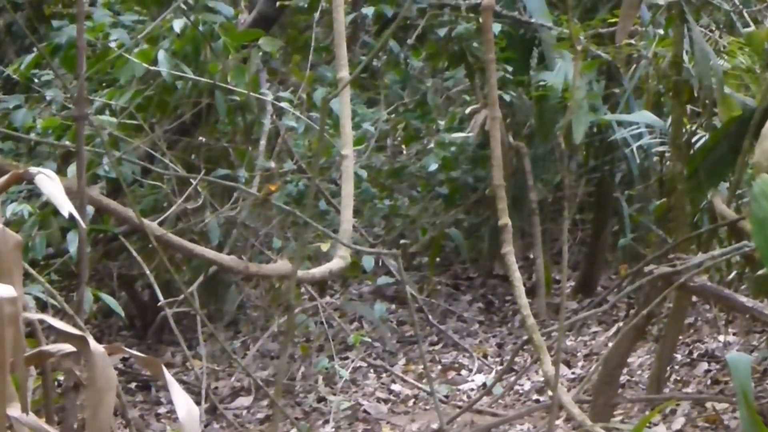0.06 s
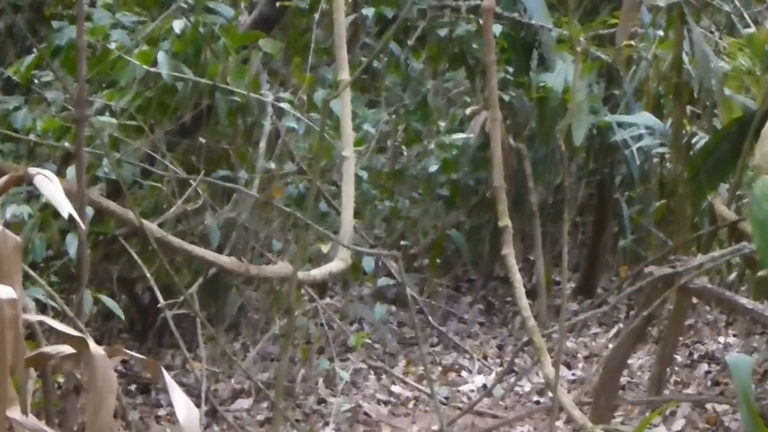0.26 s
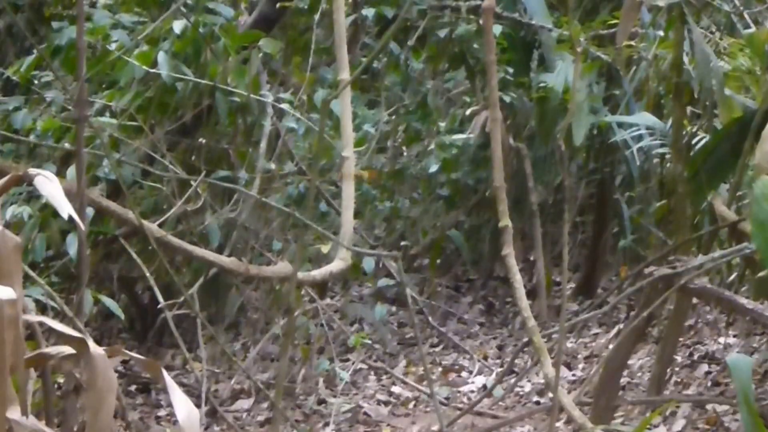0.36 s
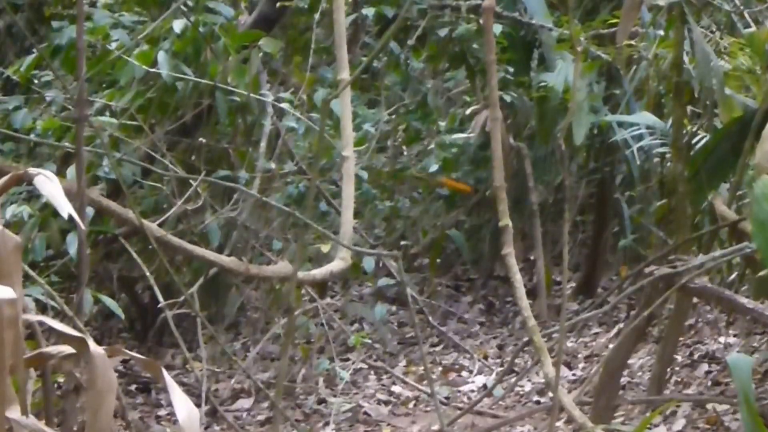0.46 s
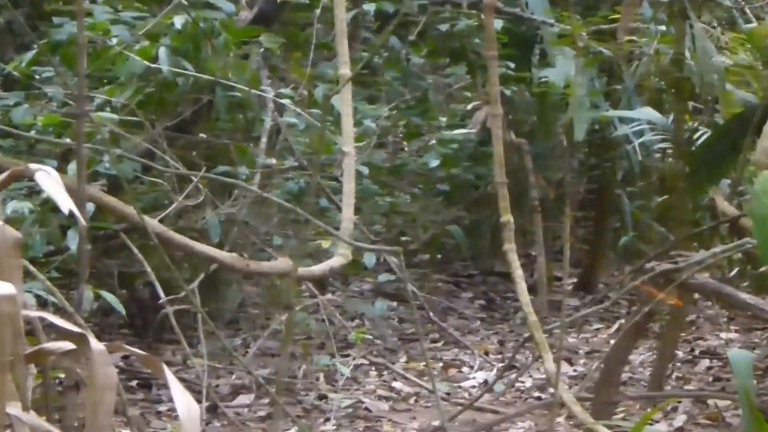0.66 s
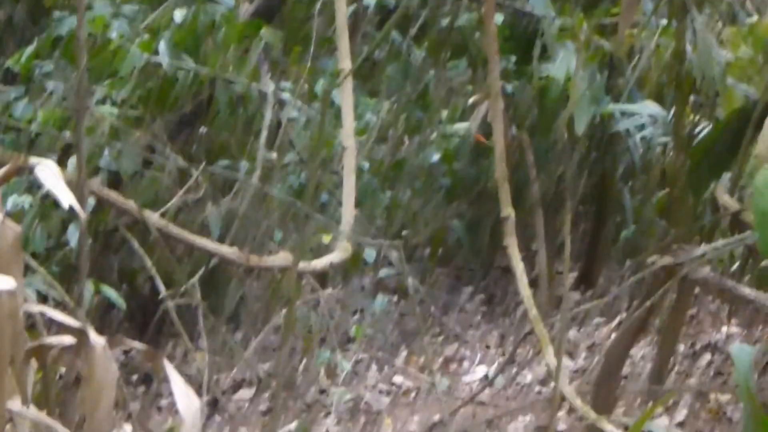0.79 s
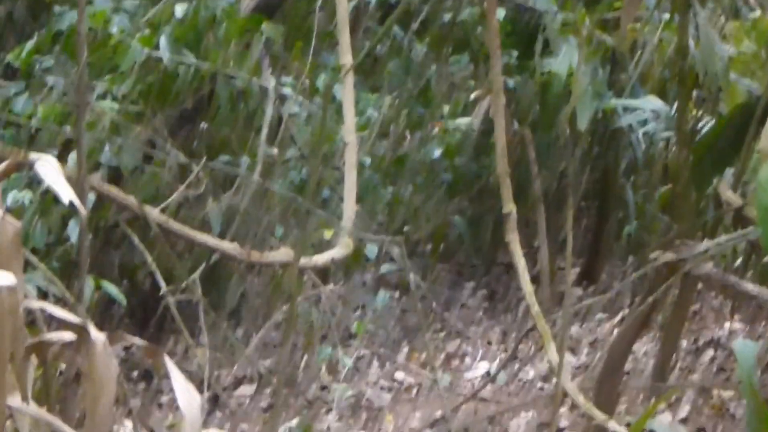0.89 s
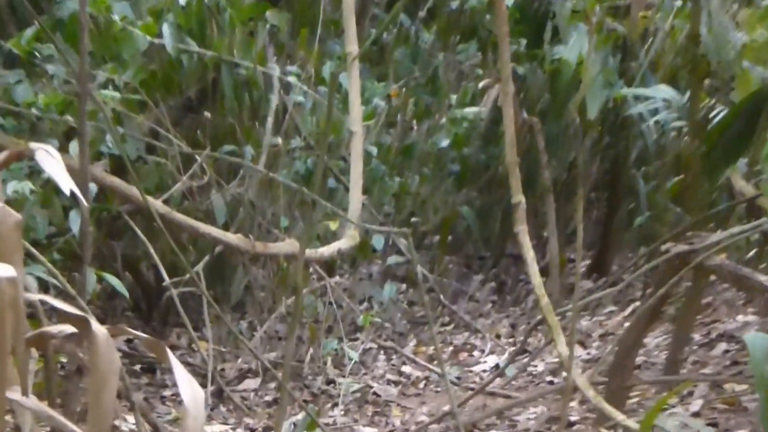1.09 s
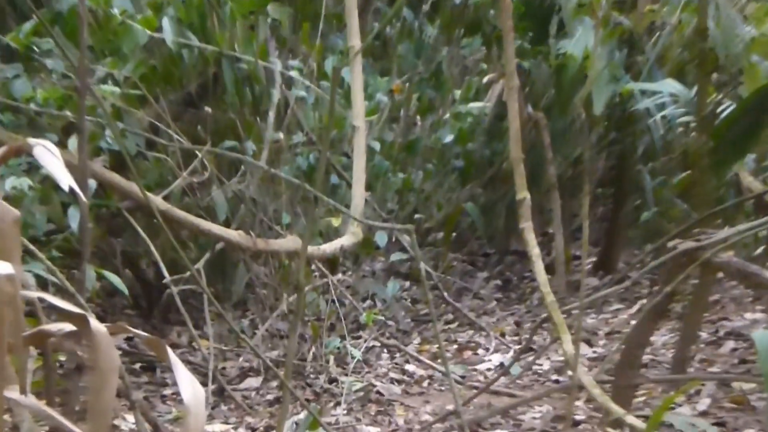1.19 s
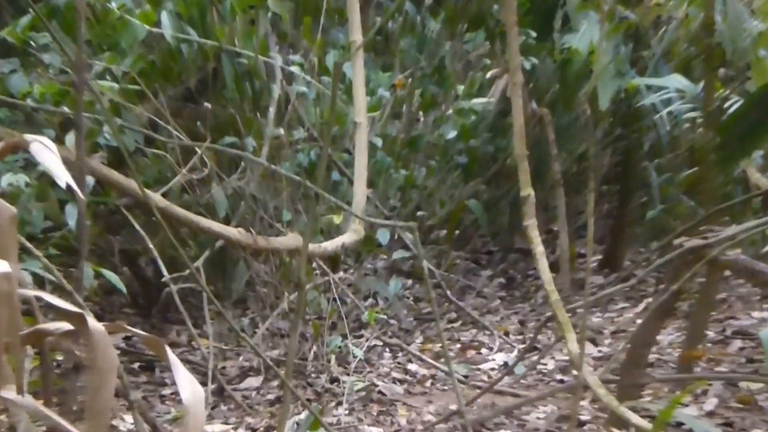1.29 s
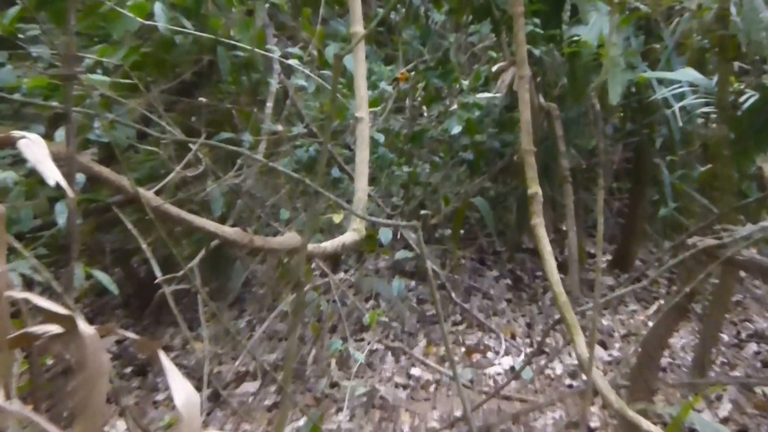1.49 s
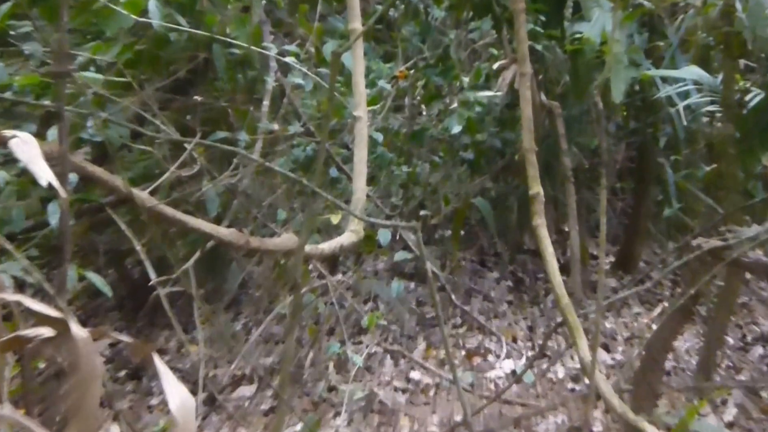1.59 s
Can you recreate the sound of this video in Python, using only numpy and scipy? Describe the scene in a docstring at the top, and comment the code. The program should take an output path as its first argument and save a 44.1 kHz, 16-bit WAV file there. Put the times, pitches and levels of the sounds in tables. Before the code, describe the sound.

A small bird snaps its wings five times and calls thinly in quiet woods.

```python
"""A manakin cracks its wings five times as it darts between saplings on a forest floor.
Each snap is a sharp pulse with a brief ring, bounced off the ground and scattered by trunks and leaves.
Air puffs through its feathers, and a thin arched call rises and falls after the fourth snap.
Behind it dry leaves stir and far birds whistle and chatter, over a low forest hush with two soft
bass swells, a faint band of insects and tiny high pips."""
import sys
import numpy as np
from scipy import signal
from scipy.io import wavfile

SR = 44100
rng = np.random.default_rng(int(sys.argv[2]) if len(sys.argv) > 2 else 0)


def master_out(mix):
    """Clip the mix to full scale and print it as 16-bit PCM to the path in sys.argv[1]."""
    frames = np.transpose(np.atleast_2d(mix))
    ceiling = np.clip(frames, -1, 1)
    pcm = np.round(ceiling * 32767).astype(np.int16)
    wavfile.write(sys.argv[1], SR, pcm)


N = 72765
TIME = np.arange(N) / SR

# wing snaps: (time [s], crack level [dB], five wing mode levels [dB], low cut [Hz],
# ground echo delay [s], ground echo gain [dB], send to twigs and forest [dB])
WING_SNAPS = [(0.2384, -11.5, -21, -23, -34, -25, -43, 1090, 0.0021, -22, -13),
              (0.4144, -14, -31, -25.5, -20, -63, -21.5, 600, 0.0031, -13, -11.5),
              (0.6327, -15.5, -21.5, -28, -52, -15.5, -20.5, 910, 0.0045, -19, -16.5),
              (0.9157, -47, -61, -34, -29.5, -52, -37, 600, 0.0022, -1.5, -14),
              (1.2910, -14.5, -31, -37, -56, -11, -8.5, 878, 0.0028, -15, -13.5)]
# the ring of the wings: (frequency [Hz], t60 [s])
WING_RING = [(1130, 0.0068), (1720, 0.018), (2380, 0.0078), (3380, 0.0062), (4750, 0.0056)]
# soft wing beats: (time [s], level [dB])
WING_BEATS = [(0.7405, -41.5), (0.756, -37), (0.770, -42), (0.8025, -36.5), (0.8175, -34.5), (0.885, -43)]
# air through the wings at take-off: (time [s], level [dB])
TAKEOFF_PUFFS = [(0.175, -56)]
# the arched call: (time [s], pitch [Hz], relative level [dB], brightness [dB],
# forest send as the bird turns [dB])
CALL_ARCH = [(0.936, 4750, -69, -18, -13), (0.973, 4930, -44, -14, -6), (0.989, 4850, -49, -16, -6),
             (0.993, 3222, -57, 9, -2), (1.010, 4080, -44.5, 3, -8), (1.022, 4380, -50, 7, 8),
             (1.04, 4390, -62, 9, 5), (1.048, 4120, -44, -13, -1), (1.06, 3726, -38, -9, -10),
             (1.095, 3073, -39.5, -8, -9.5), (1.133, 2778, -38.5, -17, -11), (1.171, 2526, -49, -23, -9),
             (1.207, 1850, -46, -20, -28)]
# the call's overtones: (multiple of the pitch, relative level [dB])
CALL_HARMONICS = [(2, -12), (3, -17.5), (4, -26)]
# the forest's diffuse reverb: (frequency [Hz], relative spectral density [dB], t60 [s])
FOREST_REVERB = [(600, -41, 0.091), (1370, -10.5, 0.38), (2160, 5, 0.36), (3130, -1, 0.61),
                 (4760, 4.5, 0.56), (6180, -2.5, 0.43), (7400, -17.5, 0.36), (15000, -20.5, .22)]
# faint rustles in the leaf litter: (time [s], level [dB])
LEAF_RUSTLES = [(1.566, -53), (1.580, -41.5)]
# a far bird's two whistles: (time [s], length [s], pitch [Hz], level [dB])
FAR_WHISTLES = [(1.405, 0.067, 1320, -53), (1.503, 0.0857, 1456, -49)]
# far chatter: (time [s], length [s], pitch [Hz], level [dB])
FAR_CHIRPS = [(-0.02, 0.06, 3036, -51), (0.09, 0.05, 2700, -47.5), (0.5, 0.057, 3080, -50)]
# tone colour of the hush: (frequency [Hz], relative spectral density [dB])
HUSH_SPECTRUM = [(25, -47), (50, -21.5), (90, -8), (140, -2), (200, -1.5), (400, -3.5), (800, -8.5),
                 (1400, -12.5), (2600, -10.5), (4500, -19), (7000, -26), (10000, -33), (15500, -36)]
# fader moves on the hush: (time [s], low band gain [dB], high band gain [dB])
HUSH_FADERS = [(0, 1, -1.5), (0.25, -1, -1.5), (0.6, 0.5, -1.5), (0.9, 0, -1.5), (1.15, -1, -0.5),
               (1.4, -3.5, -3.5), (1.65, 0, -0.5)]
# soft swells in the bass: (time [s], level [dB])
BASS_SWELLS = [(0.19, -47), (0.80, -50)]
# the recorder's narrow dips: (frequency [Hz], width [Hz])
EQ_NOTCHES = [(2905, 137), (11800, 560)]


def wing_snaps(forest, twig_echoes_per_s=4000, twig_db=-3, forest_db=8):
    """Each snap cracks and rings, then echoes off the ground, nearby twigs and the forest."""
    out = np.zeros(N)
    for s, crack_db, *mode_dbs, low_cut_hz, delay_s, ground_db, send_db in WING_SNAPS:
        hit = click(s)
        pulse = wing_crack(hit)
        ringing = sum(from_db(db) * ring(hit, hz, t60) for db, (hz, t60) in zip(mode_dbs, WING_RING))
        direct = from_db(crack_db) * pulse + ringing
        ground = from_db(ground_db) * np.interp(TIME - delay_s, TIME, direct)
        twigs = (rng.random(N) < twig_echoes_per_s / SR) * rng.standard_normal(N)
        twigs *= decay(t60=0.053) * (TIME > 0.001)  # 1 ms pre-delay
        near = direct + ground + from_db(send_db + twig_db) * reverb(pulse, twigs)
        near = butter(near, low_cut_hz, "high", order=4)
        out += butter(near, 10100, "low") + from_db(send_db + forest_db) * reverb(hit, forest)
    return out


def wing_crack(hit, hz=3610, width_hz=2180):
    """The sharp, two-sided pressure pulse of the wings meeting."""
    pulse = resonate(resonate(hit, hz, width_hz), hz, 2 * width_hz)
    return pulse / np.abs(pulse).max()


def feather_air(rows, rise_s, hz, width_hz):
    """Air pushed through the feathers: puffs of band-passed noise."""
    air = resonate(resonate(rng.standard_normal(N), hz, width_hz), hz, 2 * width_hz)
    return unit_rms(air) * puffs(rows, rise_s)


def arched_call(forest, waver=0.007, roughness_db=2.5):
    """A thin, slightly rough glide, brightest at the top of its arch, ringing on among the trees."""
    s, hz, db, bright_db, send_db = np.transpose(CALL_ARCH)
    pitch = np.interp(TIME, s, hz) * (1 + waver * drift(340))
    phase = 2 * np.pi * np.cumsum(pitch) / SR
    gate = (TIME > s[0]) * (TIME < s[-1])
    envelope = np.sqrt(2) * from_db(np.interp(TIME, s, db) + roughness_db * drift(120)) * gate
    tone = envelope * np.sin(phase)
    overtones = sum(from_db(k_db) * np.sin(k * phase) for k, k_db in CALL_HARMONICS)
    overtones *= envelope * from_db(np.interp(TIME, s, bright_db))
    leaves = rng.standard_normal(N) * decay(t60=0.28)
    direct = from_db(-7.5) * tone + from_db(-10) * overtones
    send = tone * from_db(np.interp(TIME, s, send_db))
    return direct + from_db(-4) * reverb(send, forest) + from_db(1) * reverb(overtones, leaves)


def forest_response(onset_s=0.0013):
    """Countless echoes from leaves and trunks, dying away band by band."""
    tail = sum(band * from_db(at_hz(FOREST_REVERB, hz)) * decay(at_hz(FOREST_REVERB, hz, column=2))
               for hz, band in noise_bands())
    return tail * (1 - np.exp(-TIME / onset_s))


def leaf_litter():
    """Dry leaves shift in tiny bursts of noise."""
    rustle = butter(rng.standard_normal(N), [300, 3900], "band")
    return unit_rms(rustle) * puffs(LEAF_RUSTLES, rise_s=0.0016)


def far_bird(rows, glide_hz_per_s, waver):
    """Distant notes that swell, glide a little and fade."""
    out = np.zeros(N)
    for s, length, hz, db in rows:
        progress = np.clip((TIME - s) / length, 0, 1)
        pitch = (hz + glide_hz_per_s * length * (progress - 0.5)) * (1 + waver * drift(196))
        envelope = from_db(db) * np.sqrt(2 * np.abs(np.sin(np.pi * progress)))
        out += envelope * np.sin(2 * np.pi * np.cumsum(pitch) / SR)
    return out


def forest_hush(split_hz=1200, flicker_db=2):
    """A bed of forest air that flickers band by band and dips a little near the end."""
    s, low_db, high_db = np.transpose(HUSH_FADERS)
    air = np.zeros(N)
    for hz, band in noise_bands():
        fader_db = np.interp(TIME, s, low_db if hz < split_hz else high_db)
        air += band * from_db(at_hz(HUSH_SPECTRUM, hz) + fader_db + flicker_db * drift(22))
    return from_db(-45.5) * unit_rms(air)


def bass_swells():
    """Soft low swells in the hush."""
    rumble = resonate(rng.standard_normal(N), hz=171, width_hz=60)
    return unit_rms(rumble) * puffs(BASS_SWELLS, rise_s=0.034)


def insects():
    """Insects blur into one faint, narrow band of noise."""
    return from_db(-58.5) * unit_rms(resonate(rng.standard_normal(N), hz=3076, width_hz=93))


def high_pips(hz=12450, first_s=0.004, pips_per_s=29.97, half_width_s=0.0016):
    """Tiny pips at a steady rate, probably electrical."""
    from_centre_s = (((TIME - first_s) * pips_per_s + 0.5) % 1 - 0.5) / pips_per_s
    envelope = np.exp(-(from_centre_s / half_width_s) ** 2)
    return from_db(-59.5) * envelope * np.sin(2 * np.pi * hz * TIME)


def from_db(db):
    """Decibels to gain."""
    return 10 ** (np.asarray(db) / 20)


def unit_rms(x):
    """Normalise to rms 1."""
    return x / np.sqrt(np.mean(x ** 2) + 1e-20)


def at_hz(rows, hz, column=1):
    """Read a table column along a log-frequency axis."""
    rows = np.array(rows)
    return np.interp(np.log(hz), np.log(rows[:, 0]), rows[:, column])


def butter(x, hz, kind, order=2):
    """Causal Butterworth filter."""
    sos = signal.butter(order, np.clip(hz, 10, SR / 2 - 500), kind, fs=SR, output="sos")
    return signal.sosfilt(sos, x + 1e-18)


def drift(rate_hz):
    """Smooth random modulation of rms 1."""
    return unit_rms(butter(rng.standard_normal(N + SR), rate_hz, "low")[SR:])


def click(s):
    """A unit impulse at time s."""
    return 1.0 * (np.arange(N) == int(s * SR))


def ring(x, hz, t60):
    """A damped mode: a click sets a sine ringing."""
    r, w = from_db(-60 / (t60 * SR)), 2 * np.pi * hz / SR
    return signal.lfilter([0, np.sin(w)], [1, -2 * r * np.cos(w), r * r], x + 1e-18)


def resonate(x, hz, width_hz):
    """A resonant band-pass with unity gain at its peak."""
    r, w = np.exp(-np.pi * width_hz / SR), 2 * np.pi * hz / SR
    numerator = np.array([1, 0, -1]) * (1 - r * r) / 2
    return signal.lfilter(numerator, [1, -2 * r * np.cos(w), r * r], x + 1e-18)


def noise_bands():
    """Third-octave bands of noise: (centre [Hz], samples)."""
    edges = 20 * 2 ** (np.arange(31) / 3)
    white = rng.standard_normal((2, N + SR))
    return [(np.sqrt(lo * hi), butter(white[k % 2], [lo, hi], "band")[SR:])
            for k, (lo, hi) in enumerate(zip(edges, edges[1:]))]


def decay(t60):
    """An envelope that falls 60 dB in t60 seconds."""
    return np.exp(-np.log(1000) * TIME / t60)


def puffs(rows, rise_s):
    """An envelope of short puffs that swell and fade."""
    ages = [(np.maximum(TIME - s, 0) / rise_s, db) for s, db in rows]
    return sum(from_db(db) * age * np.exp(1 - age) for age, db in ages)


def reverb(x, response):
    """Convolve with a response scaled to unit energy."""
    return signal.fftconvolve(x, response / np.sqrt(np.sum(response ** 2) + 1e-20))[:N]


def scene():
    """The mono mix: the manakin up front, far birds and the forest bed behind."""
    forest = forest_response()
    whistles = far_bird(FAR_WHISTLES, glide_hz_per_s=700, waver=0.0071)
    chatter = far_bird(FAR_CHIRPS, glide_hz_per_s=-500, waver=0.0467)
    flutter = feather_air(WING_BEATS, rise_s=0.0013, hz=2730, width_hz=480)
    takeoff = feather_air(TAKEOFF_PUFFS, rise_s=0.036, hz=4700, width_hz=1000)
    manakin = wing_snaps(forest) + flutter + takeoff + arched_call(forest)
    bed = forest_hush() + insects() + bass_swells() + high_pips()
    return (manakin + leaf_litter() + whistles + chatter + bed)[None]


def record(dry, high_cut_hz=15800):
    """Master EQ: two narrow notches and a steep high cut."""
    for hz, width_hz in EQ_NOTCHES:
        dry = signal.lfilter(*signal.iirnotch(hz, hz / width_hz, fs=SR), dry)
    return signal.sosfilt(signal.ellip(10, 0.2, 70, high_cut_hz, fs=SR, output="sos"), dry)


dry = scene()
out = record(dry)
master_out(out)
```